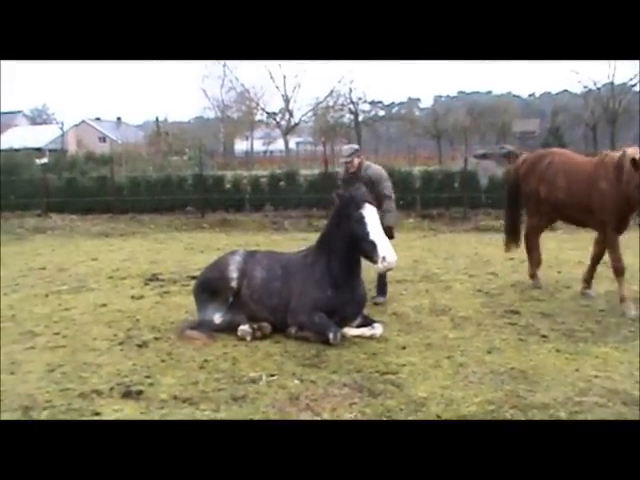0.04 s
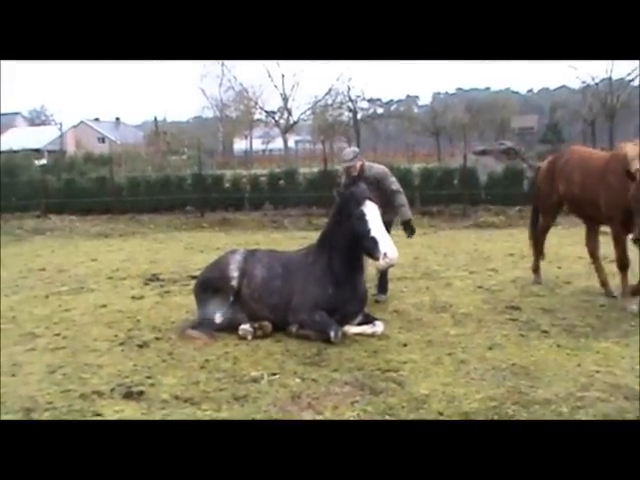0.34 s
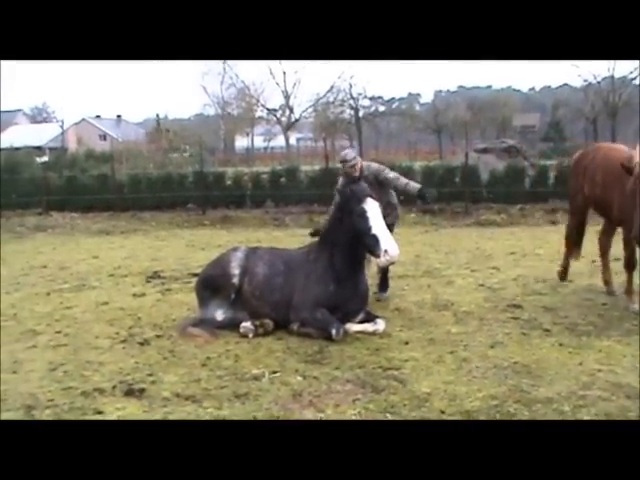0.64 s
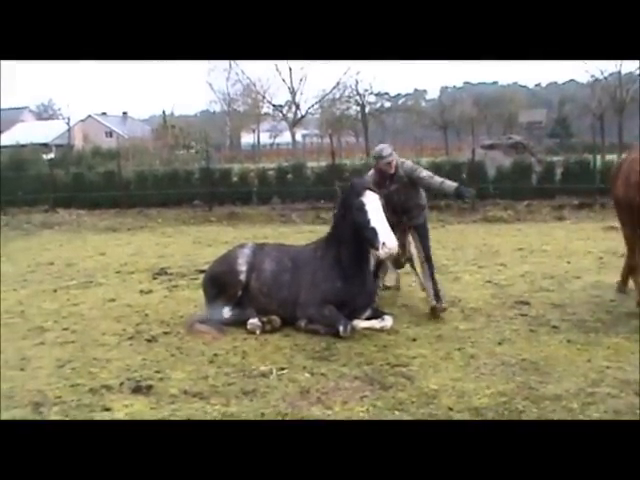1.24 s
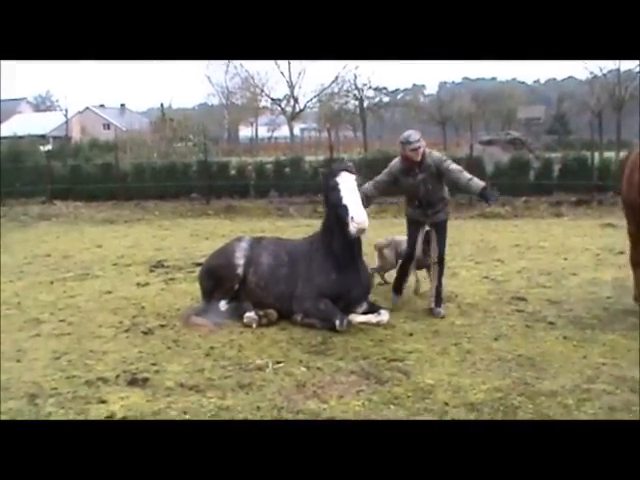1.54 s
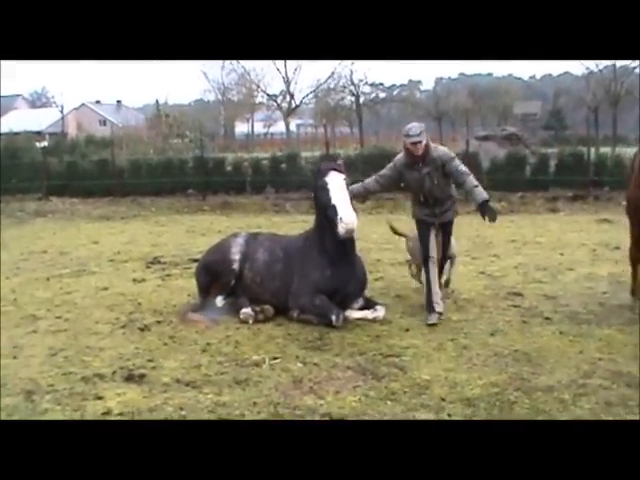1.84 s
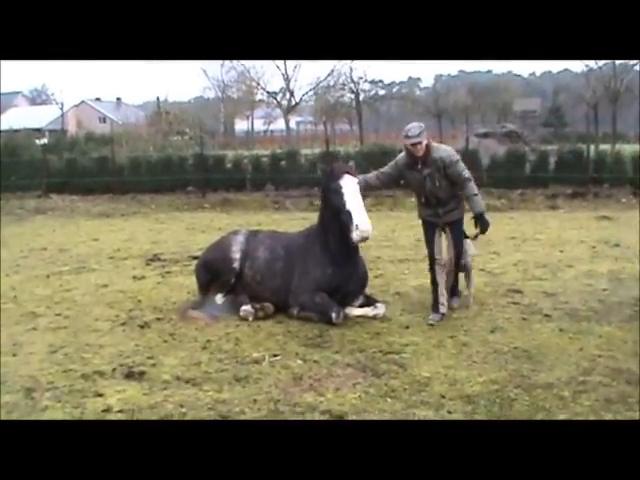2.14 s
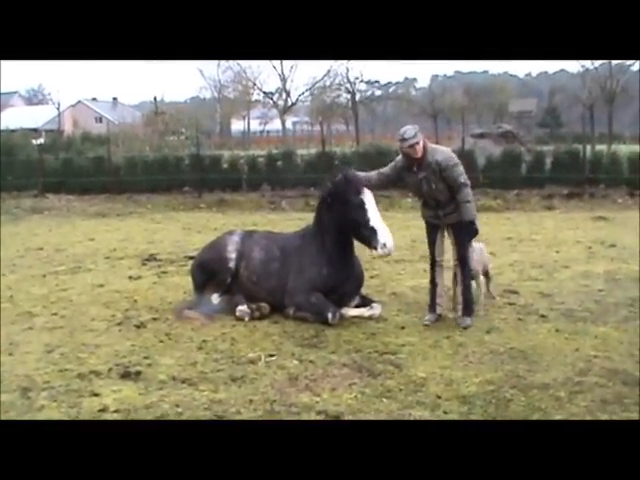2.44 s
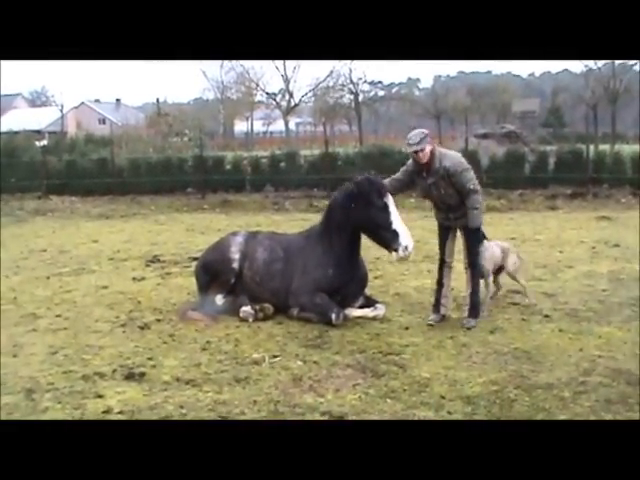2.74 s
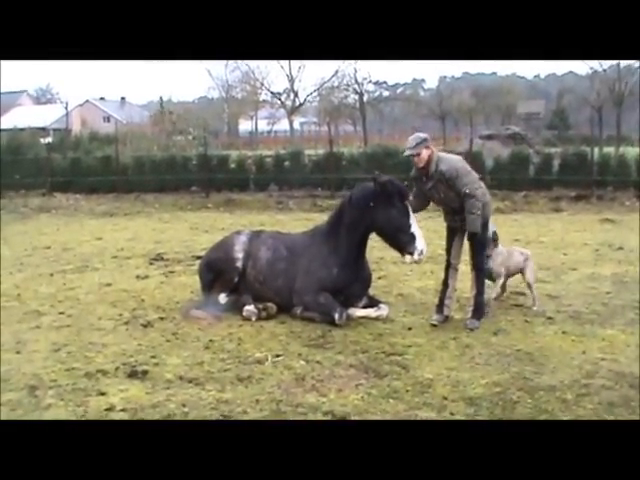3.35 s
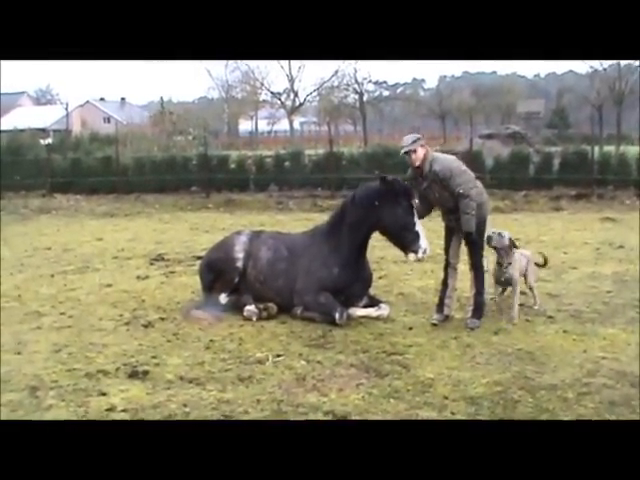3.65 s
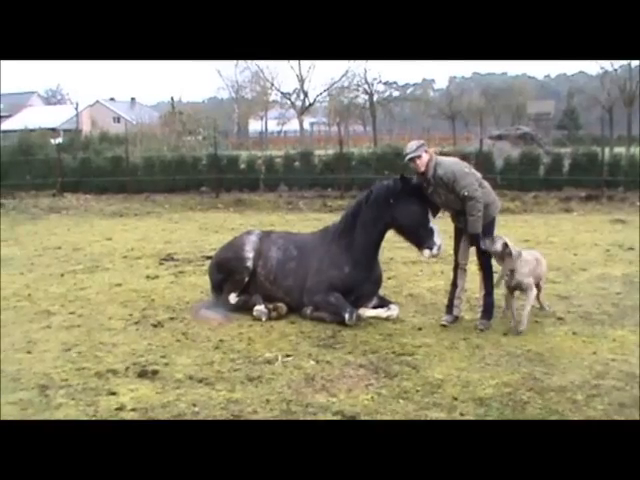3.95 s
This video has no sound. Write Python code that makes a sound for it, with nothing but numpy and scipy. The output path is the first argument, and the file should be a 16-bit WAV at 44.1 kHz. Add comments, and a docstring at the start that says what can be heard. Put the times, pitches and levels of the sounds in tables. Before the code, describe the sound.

Wind buffets the microphone outdoors, with light rustling and one sharp click.

```python
"""A grassy paddock on a breezy day. An early gust buffets the two microphone ports with a lumpy rumble,
and the recorder's gain sinks under it. As the wind eases, the dry friction of rustling swells near 1 s.
A hollow scrape at 1.4 s and a sharp snap at 1.56 s set resonances ringing; dull taps follow near 2 s.
Short scuffs brush through the second half, and the buffets build again around 3.5 s.
Small ticks, faint crackle and the hiss of open air are scattered behind it all."""
import sys
import numpy as np
from scipy import signal
from scipy.io import wavfile
from scipy.ndimage import uniform_filter1d

SR = 44100
rng = np.random.default_rng(int(sys.argv[2]) if len(sys.argv) > 2 else 0)


def generate_wav(signal):
    """Clip the signal to [-1, 1] and save it as 16-bit WAV at the path in sys.argv[1]."""
    frames = np.transpose(np.atleast_2d(signal))
    scaled = np.clip(frames, -1, 1) * 32767
    pcm = np.round(scaled).astype(np.int16)
    wavfile.write(sys.argv[1], SR, pcm)


N = 176400
T = np.arange(N) / SR
SIDE_SIGNS = np.array([[1], [-1]])  # a side signal adds on the left and subtracts on the right

# strength of the breeze at the microphone: time_s, level_db
BREEZE_CURVE = [(0, -23), (.18, -24), (.33, -13), (.5, -22), (.73, -30.5), (.82, -24), (.93, -36.5),
                (1.1, -33), (1.35, -32), (1.55, -29.5), (1.68, -22.5), (1.86, -32), (2.28, -40),
                (2.47, -28), (2.62, -36), (2.88, -28), (3.05, -37), (3.3, -33.5), (3.5, -27.5), (3.75, -24),
                (3.88, -32.5), (4, -35.5)]
# wind noise at the reference strength: frequency_hz, density_db
WIND_SPECTRUM = [(25, -10), (55, 0.5), (100, 0), (165, 4.5), (290, -10), (500, -17.5), (800, -41),
                 (1500, -50)]
# growth of each band with the breeze: frequency_hz, slope_db_per_db
WIND_GROWTH = [(30, 1.1), (70, 0.48), (150, 0.95), (300, 0.96), (1000, 1.3)]
# side relative to mid: frequency_hz, side_db
WIND_WIDTH = [(30, -11), (700, -6.5)]
def wind(level_db=-28, reference_db=-31.5, eddy_db=3, flutter_db=1.45):
    """Turbulence: pressure at the ports fluctuates, each band growing with the breeze at its own rate."""
    breeze_db = in_time(BREEZE_CURVE)[0] - reference_db + eddy_db * drift(per_s=51)
    out = 0
    for hz, band in bands(WIND_SPECTRUM, WIND_WIDTH, count=12):
        band_db = level_db + at_hz(WIND_GROWTH, hz) * breeze_db + flutter_db * drift(per_s=7.9)
        out += band * from_db(band_db)
    return out


# large eddies: peak_s, half_width_s, level_db, reach_hz
EDDIES = [(.079, 0.011, -13, 347), (0.108, 0.012, -16, 314), (.168, 0.014, -22.5, 310),
          (.216, 0.012, -13.5, 360), (.241, 0.011, -6, 376), (.269, 0.0075, -5.5, 445),
          (0.298, 0.0052, -10, 357), (.327, 0.0048, -4.5, 300), (.344, 0.01, -5, 346),
          (0.377, 0.0091, -9, 252), (.409, 0.0052, -7.5, 383), (.432, 0.017, -10, 440),
          (.495, 0.02, -20.5, 406), (0.543, 0.0092, -16, 310), (.566, .0064, -16.5, 315),
          (.639, 0.0082, -22, 250), (.787, .017, -21, 242), (1.228, 0.0049, -22, 340),
          (1.285, 0.0046, -18, 188), (1.438, .0057, -15, 360), (1.458, 0.003, -9, 440),
          (1.471, 0.0041, -9.5, 417), (1.488, 0.006, -13.5, 308), (1.53, 0.0054, -11.5, 360),
          (1.559, .016, -18, 325), (1.629, 0.0091, -24, 400), (1.656, 0.0037, -13, 403),
          (1.675, 0.0067, -12.5, 260), (1.719, .0092, -17.5, 277), (1.915, 0.0026, -23, 330),
          (1.949, 0.011, -22, 292), (2.085, 0.01, -26, 184), (2.14, 0.0066, -25, 176),
          (2.348, 0.0032, -24.5, 200), (2.39, 0.0044, -23, 290), (2.667, 0.0056, -20.5, 199),
          (2.71, 0.0083, -16.5, 189), (2.724, 0.0069, -15.5, 228), (2.948, 0.016, -22.5, 342),
          (2.984, 0.0069, -18.5, 250), (3.395, 0.017, -21.5, 236), (3.423, 0.0083, -13.5, 254),
          (3.449, .0076, -13, 236), (3.485, 0.011, -7, 207), (3.521, 0.0097, -8.5, 303),
          (3.556, 0.01, -12.5, 388), (3.645, 0.0037, -8.5, 290), (3.683, 0.01, -10, 370),
          (3.702, 0.0077, -14, 378), (3.771, 0.019, -21.5, 394), (3.936, 0.0048, -12, 195)]
def buffets(low_hz=125, side_db=-8):
    """Eddy convection: each is a pressure pulse, mostly common to both ports, with its own width and reach."""
    out, half = np.zeros((2, N + SR)), SR // 10
    age = np.arange(-half, half) / SR
    for peak_s, half_width_s, db, reach_hz in EDDIES:
        noise = butter(rng.standard_normal((2, 2 * half)), reach_hz, "low", order=2)
        noise = butter(noise, 1.09 * reach_hz, "low", order=1)  # the slope steepens just above the reach
        mid, side = butter(noise, low_hz, "high", order=2)
        window = np.exp(-(age / half_width_s) ** 2 / 2)
        lump = stereo(rms_one(mid * window), rms_one(side * window), side_db)
        start = int(peak_s * SR)
        out[:, start:start + 2 * half] += from_db(db) * rms_one(lump) * np.sqrt(np.mean(window ** 2))
    return out[:, half:half + N]


def across_ports(pressure, quarter_cycle_hz=402):
    """Phase lag: eddies reach the left port first, so an all-pass filter delays the right."""
    pole = np.exp(-2 * np.pi * quarter_cycle_hz / SR)
    left, right = pressure
    return np.array([left, signal.lfilter([-pole, 1], [1, -pole], right)])


# course of the rustle: time_s, treble_db, middle_db
RUSTLE_CURVE = [(0, -44, -43), (.07, -45.5, -49.5), (.24, -41, -45.5), (.41, -53, -49), (.49, -41, -44.5),
                (.85, -41, -46), (.92, -37, -40), (1.13, -38.5, -40.5), (1.28, -41.5, -45),
                (1.41, -39, -41), (1.52, -44, -47), (1.62, -39.5, -42), (1.74, -50, -51.5),
                (1.96, -46, -53.5), (2.13, -43.5, -44), (2.28, -52, -53), (2.46, -45.5, -47.5),
                (2.65, -52.5, -52), (2.87, -43, -48), (3.05, -51, -52), (3.33, -49, -49.5),
                (3.48, -44.5, -44.5), (3.58, -37.5, -40.5), (3.68, -45, -46), (3.9, -50, -49.5),
                (4, -46, -43.5)]
# full swishes and thin, bright ones: peak_s, rise_s, fall_s, level_db
FULL_SWISHES = [(.11, 0.041, 0.1, -43.5), (.765, 0.077, 0.081, -38), (.925, 0.027, 0.091, -36)]
THIN_SWISHES = [(1.09, 0.085, 0.18, -40.5)]
# spectra of the two hisses and the two kinds of swish: frequency_hz, density_db
TREBLE_SPECTRUM = [(3000, -30), (5000, -6), (6500, 1.5), (7800, 7), (9000, 2), (10300, -13), (12500, -13),
                   (16000, -38)]
MIDDLE_SPECTRUM = [(500, -5), (1000, -12.5), (1800, 1.5), (2600, -0.5), (4000, 0), (5300, -1), (7000, -3.5),
                   (10000, -26)]
FULL_SPECTRUM = [(2500, -33), (3300, -7), (4000, 0), (5200, -6), (6500, -10), (9000, -11)]
THIN_SPECTRUM = [(7000, -21), (8500, 9), (9300, -3), (10500, -15), (12500, -21), (15000, -7)]
# side relative to mid: frequency_hz, side_db
FRICTION_WIDTH = [(700, -14), (2000, -26), (5000, -18), (8000, -19.5), (12000, 4)]
def rustle(middle_boost_db=2, grain_db=1.28):
    """Dry friction: fine contacts make broadband hiss and swishes, all modulated by one shared grain."""
    treble_db, middle_db = in_time(RUSTLE_CURVE)
    treble = from_db(treble_db) * hiss(TREBLE_SPECTRUM, FRICTION_WIDTH, count=14)
    middle = from_db(middle_db + middle_boost_db) * hiss(MIDDLE_SPECTRUM, FRICTION_WIDTH, count=11)
    full = strokes(FULL_SWISHES) * hiss(FULL_SPECTRUM, FRICTION_WIDTH, count=8)
    thin = strokes(THIN_SWISHES) * hiss(THIN_SPECTRUM, FRICTION_WIDTH, count=10)
    return (treble + middle + full + thin) * from_db(grain_db * drift(per_s=170))


# brushing contacts: peak_s, rise_s, fall_s, level_db
SCUFF_STROKES = [(1.61, 0.028, 0.037, -35.5), (2.056, 0.015, 0.021, -29.5), (2.097, 0.0093, .009, -33),
                 (2.243, .007, .009, -35.5), (2.323, 0.0031, 0.0083, -24.5), (2.532, 0.0094, 0.021, -34),
                 (3.135, 0.014, 0.015, -41.5), (3.73, 0.0045, 0.0067, -31), (3.803, 0.0051, .005, -34),
                 (3.879, 0.0032, 0.0056, -35), (3.968, 0.0091, .012, -37.5)]
# their noise: frequency_hz, density_db
SCUFF_SPECTRUM = [(700, -7), (1500, -12), (3000, -12.5), (5000, -9), (6800, -4.5), (8000, 4), (9200, -7),
                  (11000, -10), (15000, -33)]
def scuffs(grain_db=3.5):
    """Sliding friction: each short brush is a crisp noise burst with a fast, rough grain."""
    brushes = strokes(SCUFF_STROKES) * hiss(SCUFF_SPECTRUM, FRICTION_WIDTH, count=18)
    return brushes * from_db(grain_db * drift(per_s=570))


# modes of the snap: pitch_hz, level_db, t60_s
SNAP_RINGS = [(1920, -20, 0.0068), (3020, -15, 0.0061), (4340, -6, 0.0019), (5320, -6, 0.0042),
              (6200, -7, 0.0074), (7960, -6, .004), (9300, -13, .003), (13000, -25, .002)]
def snap(start_s=1.56, crack_db=-3, tail_db=-28.5, tail_s=0.014):
    """Impulse response: one sharp click rings damped modes, and scattering leaves a short noisy tail."""
    crack = sum((-1) ** k * from_db(db) * ring(start_s, hz, t60_s)
                for k, (hz, db, t60_s) in enumerate(SNAP_RINGS))
    tail = rms_one(butter(rng.standard_normal(N), [1500, 9000], "band", order=2))
    decay = (T > start_s) * strokes([(start_s, tail_s, tail_s, tail_db)])
    return from_db(crack_db) * crack + decay * tail


# dull taps and a hollow scrape: peak_s, rise_s, fall_s, level_db, tilt_db_per_octave
TAP_STROKES = [(1.7995, 0.00024, 0.0049, -22.5, 3), (1.808, 0.0024, 0.01, -32, 2.5),
               (2.1745, 0.00061, 0.002, -18, -1)]
SCRAPE_STROKES = [(1.416, 0.015, 0.0099, -25.5, -0.3)]
# the resonances each excites: pitch_hz, bandwidth_hz, level_db
TAP_RESONANCES = [(873, 160, 8), (1150, 360, -0.5), (1810, 330, 0), (3080, 610, -9), (4770, 1200, -17.5)]
SCRAPE_RESONANCES = [(850, 53, 9), (1310, 260, -3.5), (3040, 600, -16.5), (4090, 160, -8)]
def contacts(rows, resonances):
    """Forced resonance: rough contacts drive a hollow body; harder ones favour its upper resonances."""
    out, lowest_hz = 0, resonances[0][0]
    for *stroke, tilt in rows:
        force = strokes([stroke]) * rng.standard_normal((2, N))
        response, power = 0, 0
        for k, (hz, width_hz, db) in enumerate(resonances):
            gain = from_db(db + tilt * np.log2(hz / lowest_hz))
            resonator = signal.iirpeak(hz, hz / width_hz, fs=SR)
            response += (-1) ** k * gain * signal.lfilter(*resonator, force)
            power += np.pi * width_hz / SR * gain ** 2
        out += stereo(*response, side_db=-15) / np.sqrt(power)
    return out


# tiny cracks: start_s, level_db, pitch_hz, t60_s
TICK_CRACKS = [(0.057, -18, 7400, 0.0087), (.281, -22, 7500, .01), (1.934, -22, 8100, .014),
               (2.24, -18, 6540, 0.0036), (2.393, -20, 9000, .012), (2.558, -19.5, 4600, 0.022),
               (3.194, -21.5, 8050, .01), (3.802, -20.5, 4700, 0.0093)]
def ticks(click_t60_s=0.00076, ring_db=-8.5):
    """Two-stage decay: each crack is a heavily damped click with a weaker, longer ring at its pitch."""
    return sum(from_db(db) * (ring(start_s, hz, click_t60_s) + from_db(ring_db) * ring(start_s, hz, t60_s))
               for start_s, db, hz, t60_s in TICK_CRACKS)


def crackle(per_s=16, impulse_db=-26, spread_db=7):
    """Shot noise: independent impulses of random size, band-limited to faint dry specks."""
    impulses = rng.random(N) < per_s / SR
    sizes = from_db(impulse_db + spread_db * np.minimum(rng.exponential(1, N), 2))
    return butter(impulses * sizes + 1e-18, [5000, 11000], "band", order=2)


# hiss of open air: frequency_hz, density_db
AIR_SPECTRUM = [(100, 7), (400, 10.5), (900, 12), (1600, 4.5), (3000, -1), (5000, -7.5), (7800, -12),
                (10500, -3), (13000, -7.5), (16000, -8)]
# side relative to mid: frequency_hz, side_db
AIR_WIDTH = [(200, -34), (1000, -7.5), (3000, 0), (6000, -6), (9000, -3.5), (12000, -16), (15000, -31)]
def open_air(level_db=-41):
    """Stationary noise: a steady, broad hiss behind everything."""
    return from_db(level_db) * hiss(AIR_SPECTRUM, AIR_WIDTH, count=16)


def from_db(db):
    """Decibels to amplitude ratio."""
    return 10 ** (np.asarray(db) / 20)


def rms_one(x):
    """Normalisation to unit power."""
    return x / np.sqrt(np.mean(x ** 2) + 1e-20)


def in_time(rows):
    """Linear interpolation of each column over time."""
    times_s, *columns = np.transpose(rows)
    return [np.interp(T, times_s, column) for column in columns]


def at_hz(points, hz):
    """Interpolation on a log-frequency axis."""
    frequencies_hz, values = np.transpose(points)
    return np.interp(np.log(hz), np.log(frequencies_hz), values)


def butter(x, hz, kind, order):
    """Causal Butterworth filtering."""
    return signal.sosfilt(signal.butter(order, hz, kind, fs=SR, output="sos"), x)


def stereo(mid, side, side_db):
    """Sum and difference: mid and side become left and right."""
    return mid + from_db(side_db) * side * SIDE_SIGNS


def drift(per_s):
    """Random modulation: low-passed noise of unit power."""
    step, settle = 20, 2000  # samples per point, points of run-in
    pole = np.exp(-2 * np.pi * per_s * step / SR)
    white = rng.standard_normal(N // step + settle + 2)
    slow = signal.lfilter([1], [1, -2 * pole, pole * pole], white)[settle:]
    return np.interp(np.arange(N) / step, np.arange(len(slow)), rms_one(slow))


def bands(spectrum, widths, count):
    """Band decomposition: yields (centre_hz, stereo noise), the powers adding to one."""
    edges = np.geomspace(spectrum[0][0] / np.sqrt(2), min(spectrum[-1][0], .45 * SR), count + 1)
    centres = np.sqrt(edges[1:] * edges[:-1])
    gains = from_db(at_hz(spectrum, centres)) * np.sqrt(np.diff(edges))
    gains /= np.linalg.norm(gains)
    white = rng.standard_normal((2, 2, N))
    for k, hz in enumerate(centres):
        mid, side = rms_one(butter(white[k % 2], edges[k:k + 2], "band", order=2))
        side_db = at_hz(widths, hz)
        yield hz, gains[k] * stereo(mid, side, side_db) / np.hypot(1, from_db(side_db))


def hiss(spectrum, widths, count):
    """Coloured stereo noise of unit power."""
    return sum(band for hz, band in bands(spectrum, widths, count))


def strokes(rows):
    """Contact envelopes: Gaussian rise, exponential decay."""
    envelope = 0
    for peak_s, rise_s, fall_s, db in rows:
        age = T - peak_s
        exponent = np.where(age < 0, (age / rise_s) ** 2 / 2, age / fall_s)
        envelope += from_db(db) * np.exp(-np.minimum(exponent, 20))
    return envelope


def ring(start_s, hz, t60_s):
    """Damped oscillation: a unit sine that falls 60 dB in t60_s."""
    age = np.maximum(T - start_s, 0)
    return np.sin(2 * np.pi * hz * age) * from_db(-60 * np.minimum(age / t60_s, 5))


def scene(left_bias_db=1.2):
    """Superposition: wind, contacts and open air add, with the rustling sounds slightly to the left."""
    rustling = (rustle() + scuffs() + ticks() + crackle()) * from_db(SIDE_SIGNS * left_bias_db / 2)
    air = open_air()
    rumble = across_ports(wind() + buffets())
    taps = contacts(TAP_STROKES, TAP_RESONANCES)
    scrape = contacts(SCRAPE_STROKES, SCRAPE_RESONANCES)
    return rumble + rustling + snap() + taps + scrape + air


def record(dry, limit_db=-11, release_db_per_s=55, detector_s=0.033, cutoff_hz=16000):
    """Automatic gain control: the gain ducks under strong gusts, then peaks clip and the top is cut."""
    power = uniform_filter1d(np.mean(dry ** 2, axis=0), size=int(detector_s * SR))
    level_db = 10 * np.log10(np.maximum(power, 1e-12))
    excess_db = np.maximum(level_db - limit_db, 0)
    release_db = release_db_per_s * T
    duck_db = np.maximum.accumulate(excess_db + release_db) - release_db  # instant attack, steady recovery
    clipped = np.clip(dry * from_db(-duck_db), -1, 1)
    return signal.sosfilt(signal.ellip(12, .1, 80, cutoff_hz, fs=SR, output="sos"), clipped)


dry = scene()
out = record(dry)
generate_wav(out)
```